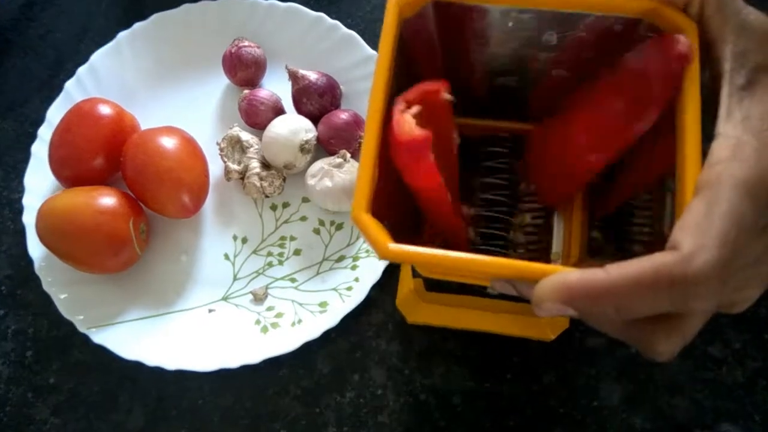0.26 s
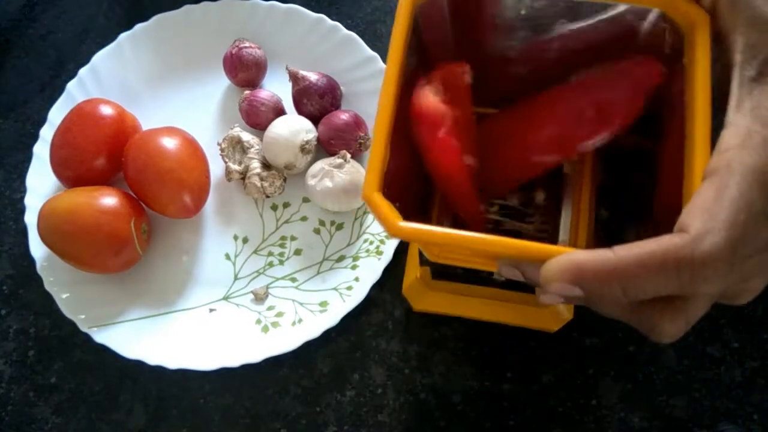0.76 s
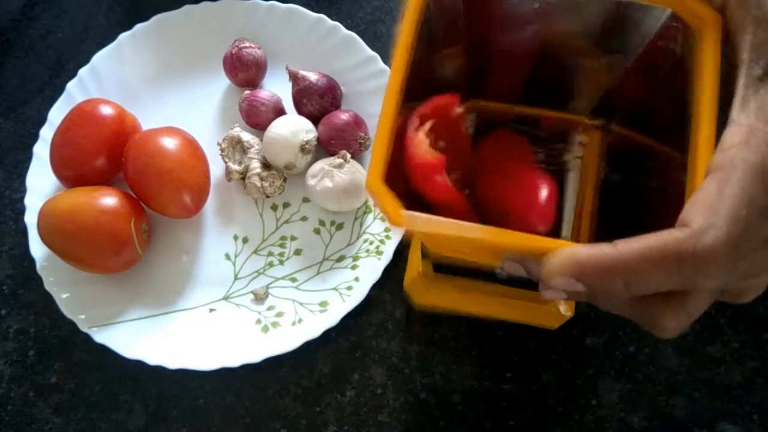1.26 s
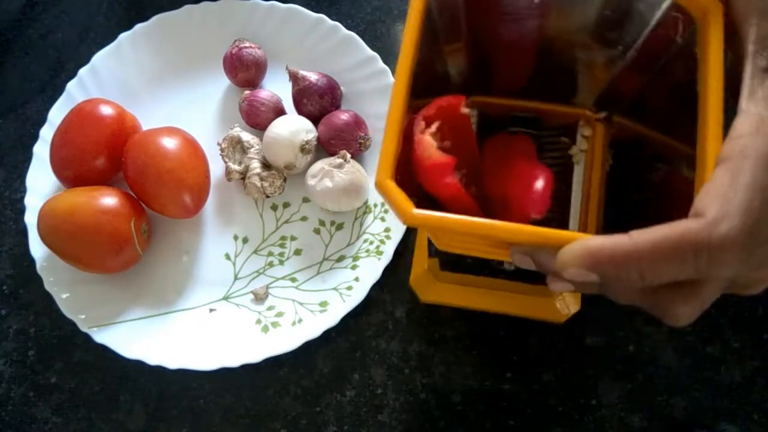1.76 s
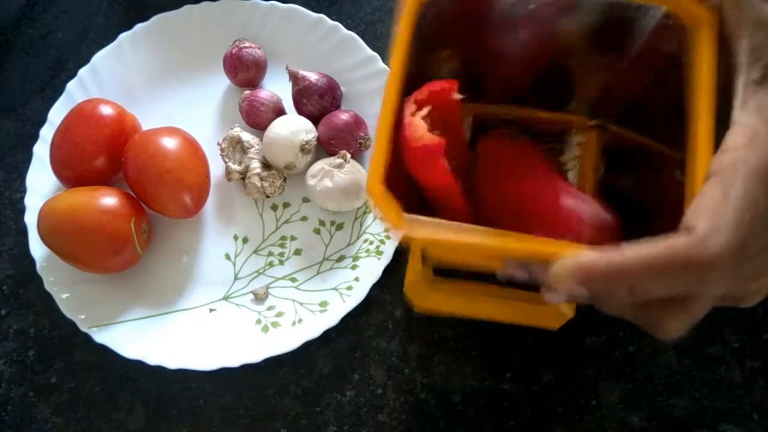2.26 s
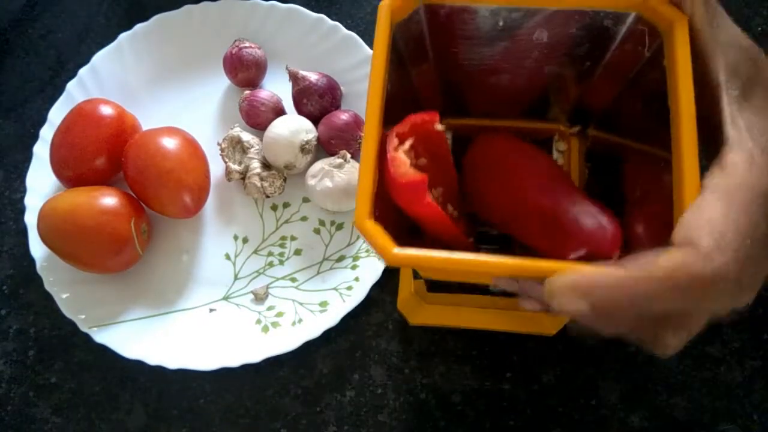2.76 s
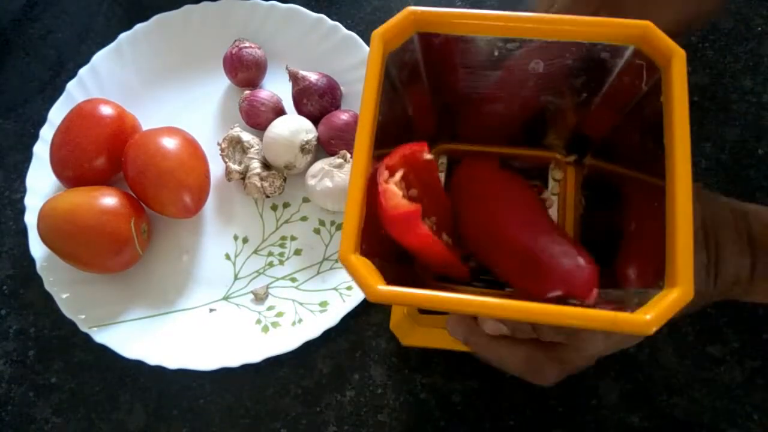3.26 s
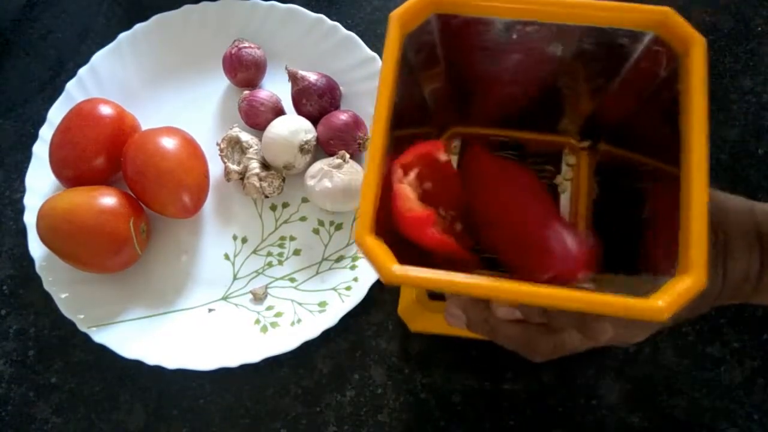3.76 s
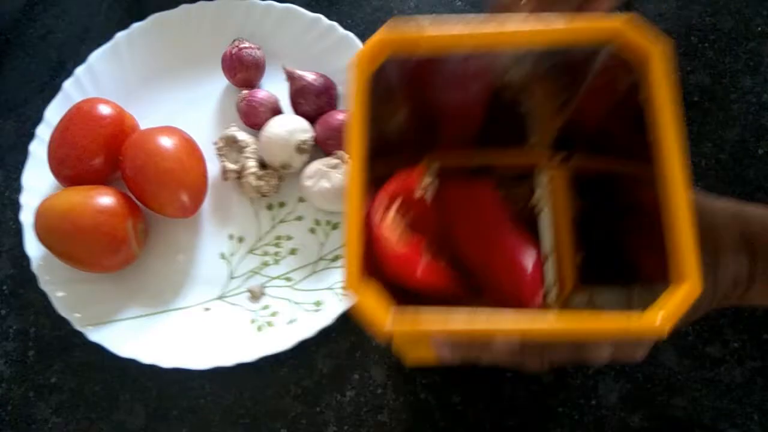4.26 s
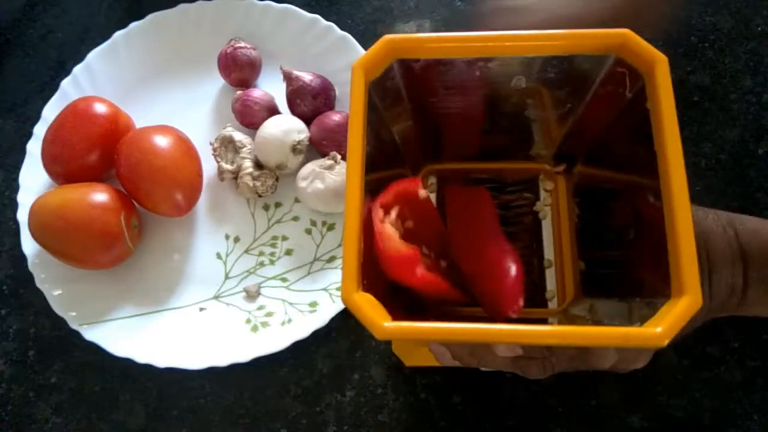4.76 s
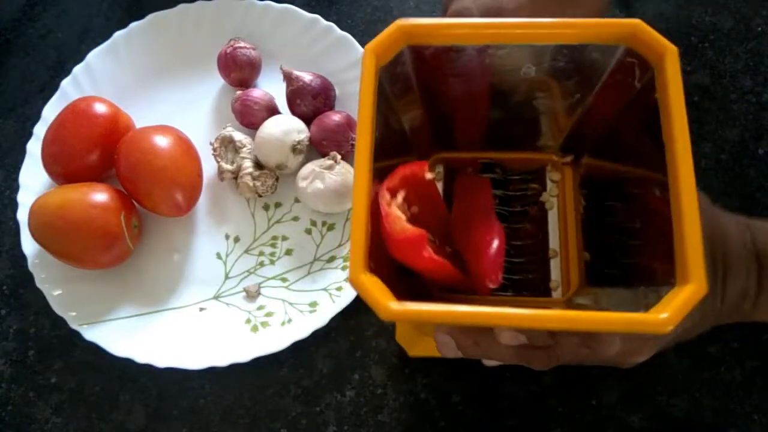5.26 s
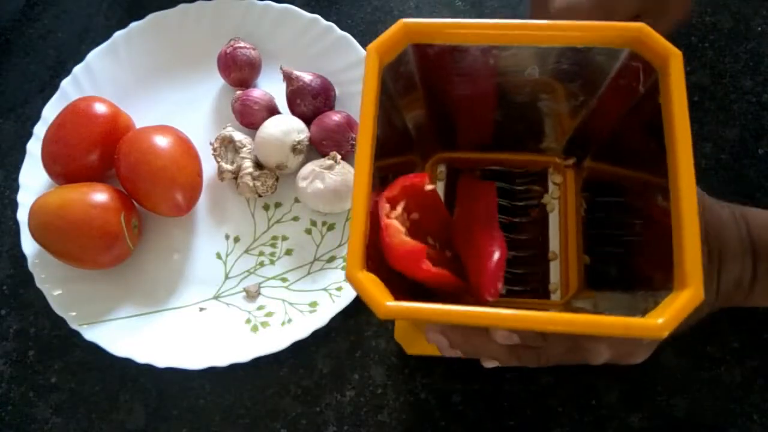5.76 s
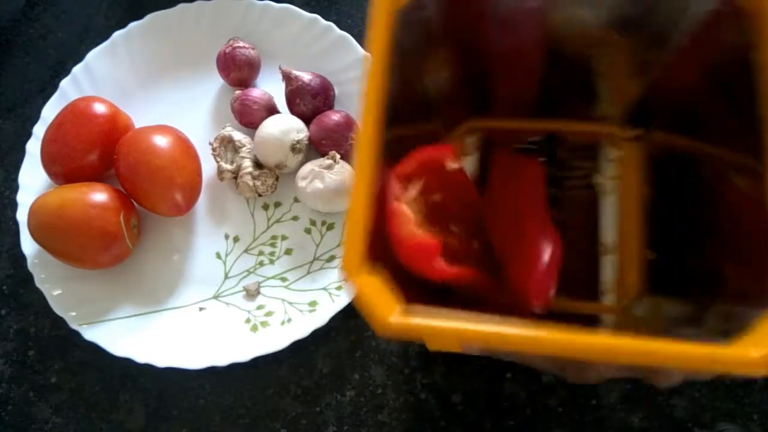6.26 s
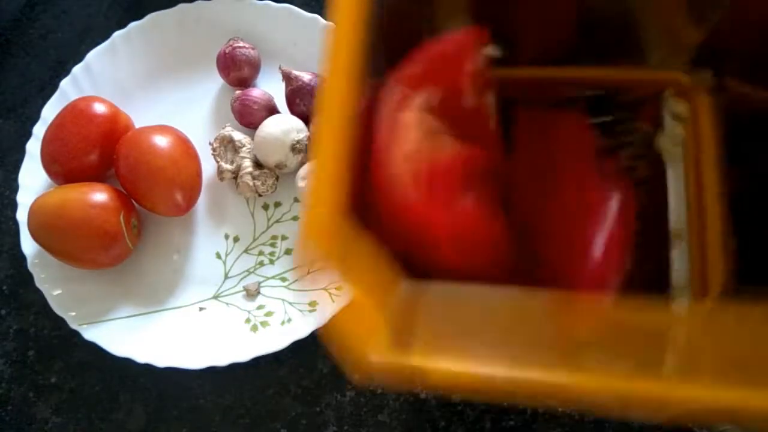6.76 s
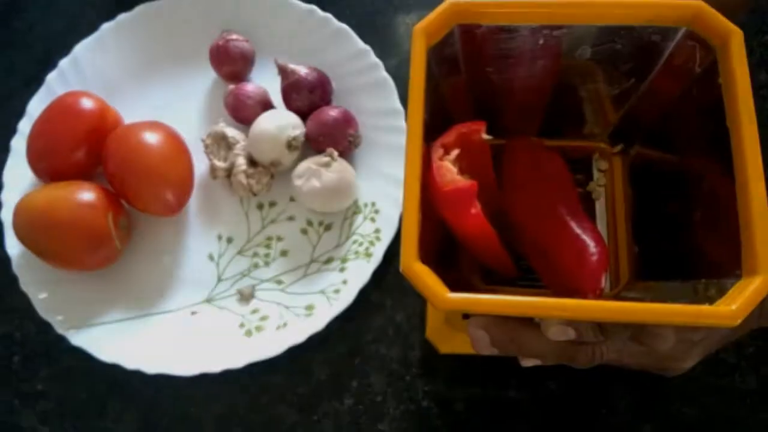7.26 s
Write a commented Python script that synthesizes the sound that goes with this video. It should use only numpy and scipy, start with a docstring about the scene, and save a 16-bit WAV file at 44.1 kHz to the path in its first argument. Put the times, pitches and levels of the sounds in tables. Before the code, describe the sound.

Close plastic clatter and gritty steel crunching from a hand-cranked chilli cutter, with low worktop thuds, short pauses and a sudden cut-off.

```python
"""A kitchen: a hand-cranked plastic chilli cutter, close to the left of a microphone with two ports.
Steel discs grind and crunch as grit and swarms of small contacts that drive decaying modes;
crank, comb and pods knock and chatter, ringing the hollow hopper, the frame and the blades.
The worktop rumbles under the pushes, and the hard room answers with a noise tail over faint room tone."""
import sys
import numpy as np
from scipy import signal
from scipy.fft import rfft, irfft
from scipy.io import wavfile
from scipy.ndimage import uniform_filter1d

SR = 44100
rng = np.random.default_rng(int(sys.argv[2]) if len(sys.argv) > 2 else 0)


def decibels_to_gain(level_db):
    """Convert a level in decibels to a linear amplitude gain (20 dB per decade)."""
    exponent = np.asarray(level_db, float) / 20
    return 10 ** exponent


def store_wav(level_fs):
    """Save 16-bit WAV to argv[1]."""
    pcm = np.round(np.clip(np.atleast_2d(level_fs), -1, 1) * 32767)
    wavfile.write(sys.argv[1], SR, pcm.T.astype(np.int16))


N = 331171

# modes of the hollow plastic hopper: (frequency [Hz], level [dB], t60 [s])
HOPPER_MODES = [(364, -8, 0.05), (415, -10, 0.22), (525.6, 4.5, 0.11), (575, -7, 0.14), (634, 6, 0.057),
                (719.4, -1, 0.11), (814, -14.5, 0.019), (875, -8, 0.17)]
# modes of the plastic frame: (frequency [Hz], level [dB], t60 [s])
FRAME_MODES = [(900, -2.5, 0.042), (1010, 2, 0.032), (1168, 3.5, 0.021), (1270, 0, 0.022),
               (1386, -2.5, 0.033), (1600, 4, 0.028), (1730, 3.5, 0.02), (1900, -6, 0.0096),
               (2090, -2, 0.046), (2210, 5.5, 0.026), (2312, -0.5, 0.054), (2600, 1, 0.03)]
# modes of the steel blade discs: (frequency [Hz], level [dB], t60 [s])
BLADE_MODES = [(2590, -5, 0.032), (3248, 3, 0.019), (3360, 1.5, 0.015), (3600, -6.5, 0.084),
               (3855, -5.5, 0.085), (4115, 1, 0.022), (4384, -2, 0.023), (4710, 2.5, 0.023),
               (5140, -3.5, 0.0098), (5340, 3.5, 0.019), (5654, 1, 0.028), (6024, 3.5, 0.015),
               (6100, -4, 0.0081), (6450, 2, 0.018)]
# grip and load shift the note that the hollow hopper favours: (time [s], frequency [Hz])
HOLLOW_NOTE = [(0.0, 622), (0.04, 685), (0.77, 658), (0.95, 681), (1.05, 574), (1.74, 550), (1.84, 678),
               (1.9, 575), (2.0, 685), (3.46, 518), (3.58, 599), (3.77, 519), (3.83, 584), (4.29, 554),
               (4.39, 670), (4.76, 603), (4.8, 527), (5.04, 630), (5.89, 567), (6.01, 640), (6.5, 562),
               (6.74, 630), (6.8, 561), (7.27, 587)]
LIFTED_S = 5.8  # the cutter leaves the worktop and loses its bass


def colour(points, size=1024):
    """Causal response of (frequency [Hz], level [dB]) points, from the folded cepstrum of the log gain."""
    hz, db = np.transpose(points)
    grid_hz = np.arange(size + 1) * SR / 2 / size
    log_gain = np.interp(np.log(grid_hz + 1), np.log(hz), np.log(decibels_to_gain(db)))
    cepstrum = irfft(log_gain)
    cepstrum[1:size] *= 2
    cepstrum[size + 1:] = 0
    return irfft(np.exp(rfft(cepstrum)))[:size]


def steady(sound):
    """Scales both ports so that the left one has rms 1."""
    return sound / np.sqrt(np.mean(sound[0] ** 2))


def loudness(sound):
    """Rms of the left port over its loudest 15 ms."""
    return np.sqrt(uniform_filter1d(sound[0] ** 2, size=660).max())


def walk(rate):
    """Random wander: levels held for 1 / rate seconds, then slewed twice."""
    hold = int(SR / rate)
    held = np.repeat(rng.standard_normal(N // hold + 1), hold)
    return 0.92 * uniform_filter1d(uniform_filter1d(held, hold), hold)[:N]


def grit(rate, spread_db):
    """Dense tiny impacts of uneven size, about rate per second, rms 1."""
    uneven = decibels_to_gain(spread_db * np.minimum(rng.exponential(size=N), 3))
    size = uneven * rng.standard_normal(N)
    hits = size * (rng.random(N) < rate / SR)
    return hits / np.sqrt(np.mean(hits ** 2))


def ports(hz, chance):
    """Weight of a mode at each port: nearly the same in the bass, another size and sign higher up."""
    apart = np.clip(hz / 720.0, 0, 1) * chance
    return np.array([np.ones_like(apart), np.sign(apart + 0.64) * decibels_to_gain(4.3 * apart)])


def ring(force, modes):
    """Two-pole resonators: each row of force drives one mode without pause."""
    out = np.zeros((2, N))
    chances = rng.standard_normal(len(modes))
    for row, (hz, db, t60), chance in zip(force, modes, chances):
        pole = np.exp(-np.log(1000) / (max(t60, .005) * SR))
        turn = 2 * np.pi * hz / SR
        resonator = [1, -2 * pole * np.cos(turn), pole ** 2]
        tone = decibels_to_gain(db) * signal.lfilter([np.sin(turn)], resonator, row)
        out += tone * ports(np.array([hz]), chance)
    return out


def kitchen():
    """Faint steady room tone: coloured noise, partly shared by the ports."""
    # spectrum of the room tone, its height set below: (frequency [Hz], density [dB per Hz])
    room_tone = [(18, -73.5), (30, -48.5), (103, 6), (152, -1.5), (199, -16), (243, 0), (290, -14),
                 (638, -18.5), (1320, -36.5), (2940, -30.5), (5600, -34), (7000, -41), (9100, -69.5),
                 (15400, -120)]
    noise = rng.standard_normal((2, N))
    noise[1] = 1.3 * noise[0] + 1.0 * noise[1]
    hum = signal.fftconvolve(noise, colour(room_tone)[None], axes=1)[:, :N]
    return decibels_to_gain(-58) * steady(hum)


def room(sound):
    """Tiles and cupboards: a dense fading tail, another one at each port, duller as it ages."""
    t60_s, treble_share = 0.35, 0.46  # the treble dies in this share of the time
    t = np.arange(int(.6 * SR)) / SR
    noise = rng.standard_normal((2, len(t)))
    dull = signal.sosfilt(signal.butter(1, 2500, fs=SR, output="sos"), noise)
    bright = noise - dull
    tail = dull * decibels_to_gain(-60 * t / t60_s) + bright * decibels_to_gain(-60 * t / (treble_share * t60_s))
    tail *= np.clip(t / 0.0029, 0, 1)  # onset ramp [s]
    tail /= np.sqrt(np.sum(tail ** 2, axis=1, keepdims=True))
    return signal.fftconvolve(sound[None], tail, axes=1)[:, :N]


def whisper():
    """Loose discs brush each other: light steel-on-steel grit keeps a few high modes singing."""
    # strength of the brushing: (time [s], level [dB])
    brushing = [(0, -74.5), (1.9, -59.5), (2.08, -57), (2.2, -63), (2.72, -93.5), (2.79, -61.5),
                (2.92, -69), (3.0, -65), (3.1, -67), (3.18, -60), (3.24, -68.5), (3.28, -60), (3.35, -80.5),
                (5.2, -73), (5.35, -67), (5.5, -88.5), (5.62, -61.5), (5.9, -78), (6.2, -70), (6.5, -72.5),
                (7.2, -75.5)]
    # top modes of the discs: (frequency [Hz], level [dB], t60 [s])
    top_modes = [(5350, 0.5, 0.028), (5600, -7, .02), (5900, 4.5, 0.03), (6300, -7.5, .02)]
    db = np.interp(np.arange(N) / SR, *np.transpose(brushing)) + 3.0 * walk(34)
    force = [grit(4000, 1.5)] * len(top_modes)
    return decibels_to_gain(db) * steady(ring(force, top_modes))


def pushes_db(t):
    """Worktop level: every push swells and dies away over a faint resting tremor."""
    # the hand's downstroke pushes the cutter into the worktop: (time [s], level [dB])
    pushes = [(.14, -51.5), (.41, -45.5), (.66, -51.5), (1.1, -49), (1.2, -36.5), (1.58, -45), (1.5, -49),
              (1.85, -44.5), (2.0, -49), (2.24, -44), (2.38, -48.5), (2.57, -49), (2.97, -52), (3.269, -48),
              (3.42, -48.5), (3.69, -39.5), (4.07, -41.5), (4.38, -44.5), (4.65, -52), (4.83, -44.5),
              (4.93, -54), (5.08, -48), (5.19, -49)]
    rise_s, fall_s, rest_db = 0.04, 0.053, -80
    gain = decibels_to_gain(rest_db - 8.0 * (t > LIFTED_S))
    for s, db in pushes:
        gain = gain + decibels_to_gain(db) * np.exp(np.minimum((t - s) / rise_s, (s - t) / fall_s))
    return 20 * np.log10(gain)


def grind(modes, db, bite, rate, spread_db, bite_db, rasp, rasp_db, alike, favoured_hz=None):
    """Grit shakes a part in uneven bites, every mode waxing on its own; some is heard directly, as a
    crackle of grains that each fill only a slice of the band rasp [Hz]."""
    bites = decibels_to_gain(bite_db * np.tanh(.6 * bite + .6 * walk(60)))
    shared = grit(rate, spread_db)
    force = []
    for hz, _, _ in modes:
        lift_db = 0
        if favoured_hz is not None:
            lift_db = 10.0 * np.exp(-(np.log(hz / favoured_hz) / 0.12) ** 2)
        force.append(shared * bites * decibels_to_gain(4.35 * walk(25) + lift_db))
    rung = steady(ring(force, modes))
    edges, rasped = np.geomspace(*rasp, num=5), 0
    for slice_hz in zip(edges, edges[1:]):
        left = grit(rate / 2, spread_db)
        right = alike * left + (1 - alike) * grit(rate / 2, spread_db)
        raw = bites * decibels_to_gain(7.1 * walk(70)) * np.array([left, right])
        band = signal.butter(1, slice_hz, "bandpass", fs=SR, output="sos")
        rasped = rasped + signal.sosfilt(band, raw)
    return decibels_to_gain(db) * (rung + decibels_to_gain(rasp_db) * steady(rasped))


def cranking():
    """Discs rub the comb and tear the pods; the push passes down into the worktop."""
    # strength of the cranking: (time [s], hopper drone level [dB], blade crunch level [dB])
    crank = [(0.0, -55, -66), (0.16, -41.5, -67), (0.28, -46.5, -65), (0.45, -58.5, -92.5),
             (0.65, -48, -61.5), (0.79, -44, -48.5), (0.97, -51, -52.5), (1.09, -44.5, -45),
             (1.24, -46.5, -51), (1.44, -61, -43.5), (1.58, -57, -53.5), (1.86, -56, -54.5),
             (2.0, -63, -59), (2.33, -56, -73), (2.43, -48, -41), (2.51, -44, -82), (2.62, -59, -88),
             (2.75, -78, -77), (2.95, -63, -66.5), (3.05, -66, -61.5), (3.2, -71, -64), (3.3, -66, -101),
             (3.44, -47, -65), (3.56, -49, -49.5), (3.64, -44, -55), (3.78, -44, -54.5), (3.88, -51, -59),
             (3.97, -44.5, -52.5), (4.33, -50, -58), (4.47, -54, -57.5), (4.59, -62, -52),
             (4.73, -50, -47.5), (4.85, -50, -66), (4.98, -52.5, -49), (5.08, -66, -64), (5.16, -56, -75.5),
             (5.32, -91, -85), (5.4, -92, -97), (5.65, -62.5, -68.5), (5.83, -51.5, -75),
             (5.97, -70, -71.5), (6.11, -68, -63.5), (6.3, -59, -59.5), (6.45, -57.5, -57.5),
             (6.65, -58, -71.5), (6.8, -55.5, -56), (6.88, -50, -60), (6.961, -50, -58.5), (7.04, -55, -71),
             (7.1, -51, -75), (7.16, -53, -78), (7.24, -46, -67)]
    # modes of the worktop: (frequency [Hz], level [dB], t60 [s])
    worktop_modes = [(110, -10.5, 0.12), (132.2, 1.5, 0.32), (145, 5, 0.32), (237, -5.5, 0.25),
                     (324, 2, 0.18)]
    t = np.arange(N) / SR
    s, *columns = np.transpose(crank)
    hopper_db, blade_db = (np.interp(t, s, column) for column in columns)
    frame_db = -2 + .75 * blade_db + .25 * hopper_db  # the frame scrapes between both
    note_hz = np.interp(t, *np.transpose(HOLLOW_NOTE))
    bite = walk(45)
    hopper = grind(HOPPER_MODES, hopper_db, bite, 1200, 1.4, 5.5, rasp=(400, 900), rasp_db=-13,
                   alike=0.47, favoured_hz=note_hz)
    frame = grind(FRAME_MODES, frame_db, bite, 1000, 3.2, 12.0, rasp=(900, 3000), rasp_db=-7.0, alike=.4)
    blades = grind(BLADE_MODES, blade_db, bite, 2200, 3.0, 7.9, rasp=(2700, 14000), rasp_db=4.0, alike=0.48)
    worktop = grind(worktop_modes, pushes_db(t), bite, 1500, 2.37, 1.3, rasp=(110, 340), rasp_db=-15,
                    alike=0.82)
    return hopper + frame + blades + worktop


def struck(modes, t, detune, scatter_db, spot_hz, spot_db, free=1):
    """One blow's ring: loose walls split each mode into a close cluster; modes near spot_hz stand out."""
    hz, db, t60 = np.repeat(np.transpose(modes), repeats=3, axis=1)
    shift, scatter, side, start = rng.standard_normal((len(hz), 4)).T
    near = np.exp(-(np.log(hz / spot_hz) / 0.12) ** 2)
    phase = 2 * np.pi * np.outer(hz * (1 + detune * shift), t) + 1.267 * start[:, None]
    tones = np.sin(phase) * decibels_to_gain(-60 * t / np.maximum(free * t60, .004)[:, None])
    weight = ports(hz, side) * decibels_to_gain(db + scatter_db * scatter + spot_db * near)
    return weight @ tones


def contacts(events, ms, first, rise, density, crack_db, spot_db, uneven_db, free, lead_s=0, size=3072):
    """A first contact, then a swarm of uneven small ones that swells and dies over the fade time ms;
    plastic and steel each get their own; free stretches the ring of frame and blades."""
    out, t = np.zeros((2, N + 2 * size)), np.arange(size) / SR
    snap = colour([(1000, -35.5), (2500, -12.0), (4000, -6), (9000, 6.0), (16000, -0.5)])
    soft = signal.butter(1, 3180, fs=SR, output="sos")  # plastic meets plastic softly: dull above this
    # the first contact swells and is over within 2.42 ms
    landing = np.sin(np.pi * np.minimum(1000 * t / 2.42, 1)) * np.exp(-2000 * t / 2.42)
    fade = t / (ms / 1000)
    swell = np.exp(-fade) * (1 - np.exp(-fade / rise))
    rows = [0, 1, 1]  # plastic, steel, steel's crack at the right port
    for s, frame_db, hopper_db, blade_db, spot_hz in events:
        swarm = rng.standard_normal((3, size)) * (rng.random((3, size)) < density)[rows]
        swarm *= decibels_to_gain(uneven_db * np.minimum(rng.exponential(size=(2, size)), 3))[rows]
        push = swarm * swell
        push += first * np.array([[1], [.6], [.6]]) * landing * rng.standard_normal((3, size))
        push[0] = signal.sosfilt(soft, push[0])
        plastic, steel = push[:1], push[1:2]
        note_hz = np.interp(s, *np.transpose(HOLLOW_NOTE))
        hopper = struck(HOPPER_MODES, t[:3072], .012, 1.0, note_hz, 9.7)
        frame = struck(FRAME_MODES, t[:2560], 0.043, 2.3, spot_hz, spot_db, free)
        blades = struck(BLADE_MODES, t[:2560], 0.022, 2.2, spot_hz, spot_db, free)
        hopper = signal.fftconvolve(hopper, plastic, axes=1)
        frame = signal.fftconvolve(frame, plastic, axes=1)
        blades = signal.fftconvolve(blades, steel, axes=1)
        crack = signal.fftconvolve(push[1:], snap[None], axes=1)
        parts = (decibels_to_gain(frame_db) * frame / np.abs(frame[0]).max(),
                 decibels_to_gain(hopper_db) * hopper / loudness(hopper),
                 decibels_to_gain(blade_db) * blades / loudness(blades),
                 decibels_to_gain(blade_db + crack_db) * crack / loudness(crack))
        i = int((s - lead_s) * SR)
        for part in parts:
            out[:, i:i + part.shape[1]] += part
    # so small a body radiates little bass, still less once held in the air
    down, up = (signal.sosfilt(signal.butter(2, hz, "highpass", fs=SR, output="sos"), out[:, :N])
                for hz in (240, 400))
    return np.where(np.arange(N) < LIFTED_S * SR, down, up)


def pings():
    """One disc is flicked and chirps almost alone: a short swarm that favours the modes near one pitch."""
    # flicks: (time [s], frame peak [dB], hopper level [dB], blades level [dB], favoured pitch [Hz])
    flicks = [(0.112, -60, -63, -37, 5600), (0.165, -47, -51, -37, 3850), (2.709, -49, -53.5, -54, 5600),
              (2.711, -60, -58, -54.5, 3360), (3.041, -65, -69, -44.5, 4140),
              (3.044, -57, -63, -45.5, 3600), (3.5375, -28.5, -44, -32.5, 5600),
              (4.3085, -43, -45.5, -33, 4200), (4.311, -50, -52, -35, 3600), (4.319, -45, -45, -30, 4200),
              (4.322, -52, -50.5, -36, 3600), (5.083, -30.5, -48, -38, 4050)]
    return contacts(flicks, ms=1.3, first=0, rise=.8, free=0.81, density=0.34, crack_db=-15.5,
                    spot_db=23.0, uneven_db=2.5)


def rattles():
    """Loose discs rattle on after some blows: a long fading swarm of sparse contacts."""
    # rattles: (time [s], frame peak [dB], hopper level [dB], blades level [dB], favoured pitch [Hz])
    loose = [(4.372, -18, -44, -32, 1900), (4.39, -24, -46.5, -39, 850), (4.365, -39, -50.5, -31.5, 4800),
             (6.045, -22, -43.5, -37, 1860), (6.05, -27, -46, -41, 1200), (6.04, -42, -56.5, -37, 4750),
             (0.79, -36, -41.5, -45.5, 1100), (1.7, -33, -39.5, -49, 1100), (2.235, -39, -44, -64.5, 1500),
             (2.375, -28, -41, -58, 1000), (5.2, -31.5, -43.5, -57, 1000)]
    return contacts(loose, ms=59.6, first=0, rise=0.039, free=1.8, density=.025, crack_db=-5.5,
                    spot_db=10.5, uneven_db=3.5, size=16384)


def crunches():
    """The discs bite into pod and comb: no sharp start, a dense ragged swell."""
    # bites: (time [s], frame peak [dB], hopper level [dB], blades level [dB], favoured pitch [Hz])
    torn = [(0.1044, -35.5, -36.5, -36, 900), (0.2448, -58, -45.5, -44.5, 904),
            (0.4144, -29, -46, -41, 4200), (0.5894, -47, -54, -54.5, 3700), (0.781, -45, -38.5, -37, 5400),
            (2.68, -67, -56, -66.5, 3300), (3.371, -40, -58, -44.5, 6000), (7.04, -63, -57, -46, 3500),
            (3.085, -48.5, -65, -70, 2100), (0.837, -53, -40.5, -43.5, 921),
            (0.9068, -33.5, -40, -37.5, 1190), (1.049, -34.5, -48, -49, 902),
            (1.0964, -29.5, -46, -42.5, 1220), (1.2584, -35, -43.5, -38.5, 3260),
            (1.152, -31.5, -47, -37.5, 1310), (1.285, -35, -45, -41, 3040), (1.322, -55, -57, -45, 2400),
            (1.3853, -51, -60, -41, 5570), (1.4374, -37, -42.5, -37, 4300),
            (1.4576, -31.5, -39, -33.5, 1190), (1.4964, -32, -39, -38, 934),
            (1.5569, -29.5, -35, -33.5, 2040), (1.6631, -43, -46.5, -47.5, 2410),
            (1.718, -39, -52, -40.5, 3350), (1.8118, -46, -47, -35.5, 4115),
            (1.8507, -29.5, -42, -39.5, 2300), (1.908, -30.5, -37.5, -37.5, 2280),
            (2.115, -52, -59.5, -53.5, 3600), (2.198, -42, -51.5, -56.5, 1700),
            (2.238, -31.5, -37.5, -54, 1500), (2.418, -39, -42, -44.5, 4200), (2.14, -51, -67, -47, 3600),
            (2.982, -46, -53, -61, 915), (3.32, -67, -53.5, -75, 900), (3.185, -50, -54, -64, 1900),
            (1.385, -40, -54, -51, 2300), (1.66, -43.5, -45, -55, 2490), (0.848, -46, -48, -46, 5600),
            (3.244, -48, -54.5, -60.5, 1720), (3.582, -28, -47, -44, 1200),
            (3.2106, -42.5, -54.5, -66, 1420), (3.1333, -43.5, -52.5, -62, 2400),
            (3.1634, -46.5, -50.5, -60, 1050), (3.9934, -50, -41.5, -45.5, 2150),
            (4.0854, -51, -44.5, -53, 940), (4.1699, -34, -56, -43, 1220), (4.2388, -38, -54, -45, 1070),
            (4.6558, -35.5, -39.5, -37.5, 1200), (4.6743, -26.5, -38.5, -38, 1010),
            (4.6994, -38, -45, -46, 996), (4.7646, -33, -42, -35, 1330), (4.7865, -34.5, -35, -37.5, 1150),
            (4.93, -40, -45, -54, 1190), (5.0334, -49, -48.5, -44.5, 4360), (5.0699, -37.5, -42, -36, 3130),
            (5.16, -45, -47.5, -45, 1990), (5.5944, -69, -65, -61.5, 5350),
            (5.785, -35.5, -51, -52.5, 1000), (5.918, -59.5, -70.5, -52, 6100), (5.95, -57, -71, -47, 3900),
            (6.5374, -38, -44.5, -41, 1220), (6.5744, -34, -44.5, -36.5, 6500),
            (6.5994, -38, -60, -43.5, 4050), (7.0728, -43, -43, -47, 1037), (7.0894, -42, -43, -45.5, 2400),
            (7.1786, -50, -45, -46.5, 1144)]
    return contacts(torn, ms=11.47, first=0, rise=5.2, free=0.73, density=0.14, crack_db=-1.0,
                    spot_db=7, uneven_db=3.5, lead_s=.006)


def knocks():
    """Crank, comb and pods strike sharply and chatter."""
    # blows: (time [s], frame peak [dB], hopper level [dB], blades level [dB], favoured pitch [Hz])
    blows = [(0.0234, -51, -41, -55, 1050), (0.0788, -15, -24, -50, 1090), (0.089, -38, -34, -56.5, 1000),
             (0.1695, -32, -30.5, -43, 1010), (0.308, -25, -45, -35, 1580), (0.3561, -34, -42, -52, 2480),
             (0.3855, -22, -29.5, -43.5, 907), (0.5745, -27, -44, -39.5, 902),
             (0.6595, -15, -28, -36, 1100), (0.7594, -38, -33, -53, 1070), (0.774, -28, -36, -47, 1000),
             (0.7896, -18.5, -40, -31, 980), (0.8904, -38, -34.5, -59, 1190),
             (0.9462, -29.5, -46, -40, 918), (1.1651, -23.5, -33.5, -44.5, 1500),
             (1.199, -39, -36, -51, 1000), (1.6287, -30.5, -38.5, -61, 1000),
             (1.8996, -28, -35, -32.5, 4000), (1.985, -15, -27, -28.5, 2290),
             (2.2226, -16, -31.5, -37, 2300), (2.364, -14, -25.5, -32.5, 950),
             (2.4114, -29, -37, -44.5, 1090), (2.4444, -26, -32, -30.5, 3720),
             (2.5516, -37, -36.5, -55, 1010), (2.9306, -40, -45.5, -58, 942), (2.948, -55, -51.5, -65, 950),
             (3.3754, -20, -28.5, -48, 1050), (3.4804, -27.5, -39, -40, 1040),
             (3.4961, -38, -46, -32, 1030), (3.5999, -22.5, -34, -37, 1280),
             (3.6561, -26, -34, -36.5, 1070), (3.6702, -20, -27.5, -31.5, 1010),
             (3.7524, -18, -35, -37, 1600), (3.8063, -34, -52, -36, 2400),
             (3.8192, -24, -38.5, -59.5, 1270), (4.0342, -24.5, -27, -34.5, 940),
             (4.0544, -36, -43, -35.5, 1070), (4.1224, -28, -45, -31, 2380), (4.195, -41, -50, -42, 2500),
             (4.337, -19, -34, -28.5, 890), (4.3566, -10.5, -45, -20, 1960),
             (4.3666, -11.5, -50.5, -31.5, 1900), (4.922, -36, -55, -46.5, 900),
             (5.1078, -40.5, -44.5, -34, 6500), (5.1487, -46, -36.5, -39.5, 977),
             (5.2001, -22.5, -34.5, -54.5, 1010), (5.213, -41.5, -42, -58, 1300),
             (5.25, -49, -51.5, -69, 1007), (5.3038, -57, -63, -48, 3200),
             (5.693, -15.5, -30.5, -42.5, 2600), (5.9744, -33.5, -65, -37.5, 5640),
             (6.0267, -19, -30.5, -21, 900), (6.038, -11, -40, -23.5, 2090),
             (6.3364, -48, -45.5, -51, 3070), (6.3734, -34, -40, -45.5, 1220),
             (6.5114, -59, -45, -40, 4800), (6.7314, -18, -23.5, -37, 1550),
             (6.7585, -32.5, -24.5, -31.5, 2500), (6.8084, -47, -41, -45, 1020),
             (6.8874, -52, -39.5, -66.5, 1600), (6.9496, -30, -35, -44.5, 1270),
             (7.1164, -57, -41.5, -66, 1030), (7.1946, -36, -51.5, -36.5, 1130),
             (7.2178, -49.5, -37, -47, 934), (7.248, -50, -40.5, -47.5, 1007),
             (7.2682, -16.5, -18, -41, 1197)]
    return contacts(blows, ms=4.4, first=1.3, rise=0.33, free=1.0, density=.15, crack_db=-0.5,
                    spot_db=8.5, uneven_db=1.7)


def scene():
    """The cutter, its room and the room tone; the right port is shaded and much weaker."""
    # shading of the right port: (frequency [Hz], level [dB])
    shading = [(30, -10.5), (100, -14), (250, -20.5), (550, -12.5), (1100, -15.5), (2200, -14),
               (4500, -15.5), (9000, -22.5)]
    cutter = decibels_to_gain(3.5) * (knocks() + crunches() + rattles() + pings() + cranking() + whisper())
    # the right port gets slightly more room
    wet = decibels_to_gain(-7.5) * np.array([[1], [decibels_to_gain(0.5)]]) * room(cutter[0])
    left, right = cutter + wet + kitchen()
    return np.array([left, signal.fftconvolve(right, colour(shading))[:N]])


def band_limit(x):
    """A steep low-pass at the top of the band."""
    return signal.sosfilt(signal.butter(12, 15000, fs=SR, output="sos"), x)


def record(dry):
    """The microphone falls away steeply above 7 kHz; the sound stops short."""
    # response of the microphone: (frequency [Hz], level [dB])
    microphone = [(30, -19.5), (200, -6.5), (1000, 0.5), (5500, -3.5), (6800, -7.5), (7300, -14),
                  (7600, -21.5), (7850, -42.5), (8200, -42.5), (8600, -23.5), (9400, -26.5), (10300, -44),
                  (13000, -50), (15500, -55), (16500, -97)]
    end_s, fade_s = 7.279, 0.0017
    heard = signal.fftconvolve(dry, colour(microphone)[None], axes=1)[:, :N]
    mix = heard * np.clip((end_s - np.arange(N) / SR) / fade_s, 0, 1)
    return band_limit(mix)


dry = scene()
out = record(dry)
store_wav(out)
```